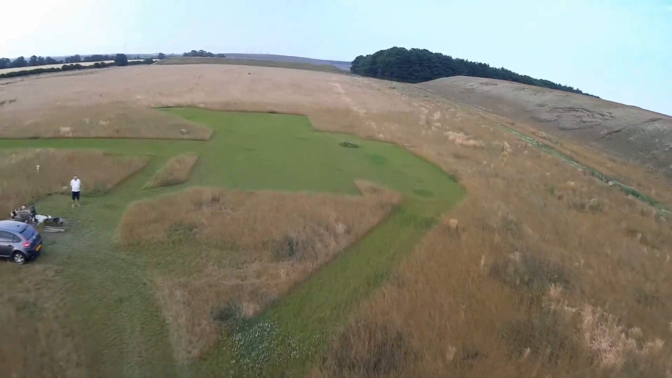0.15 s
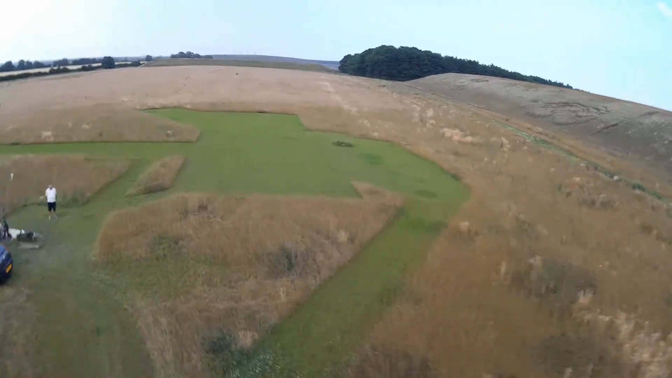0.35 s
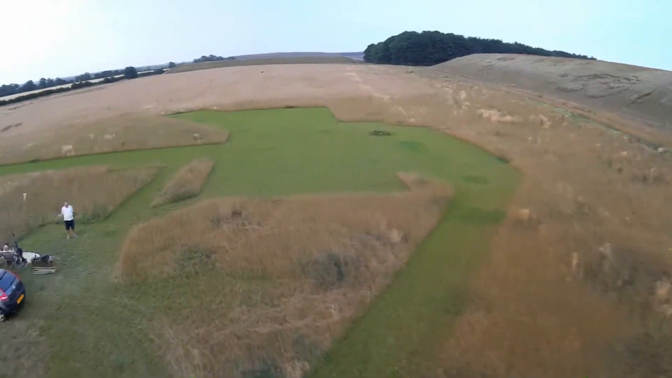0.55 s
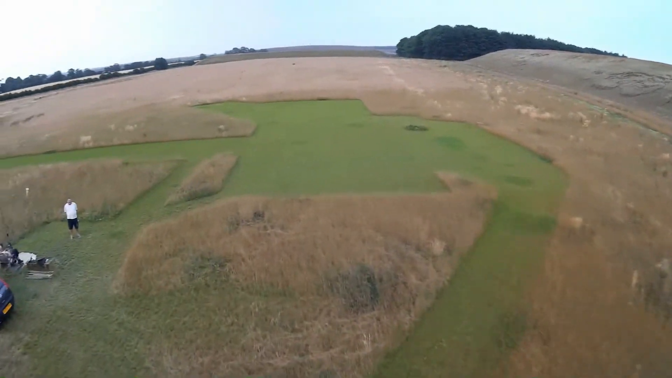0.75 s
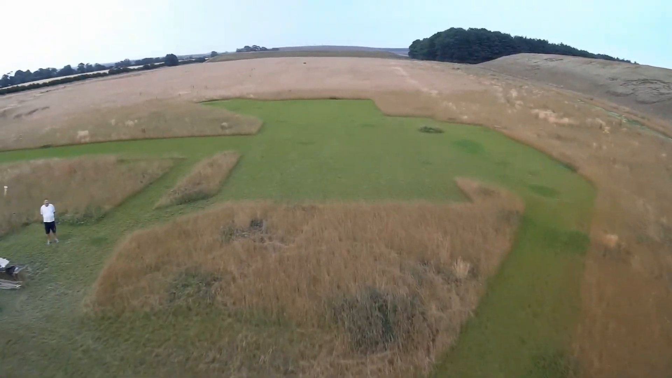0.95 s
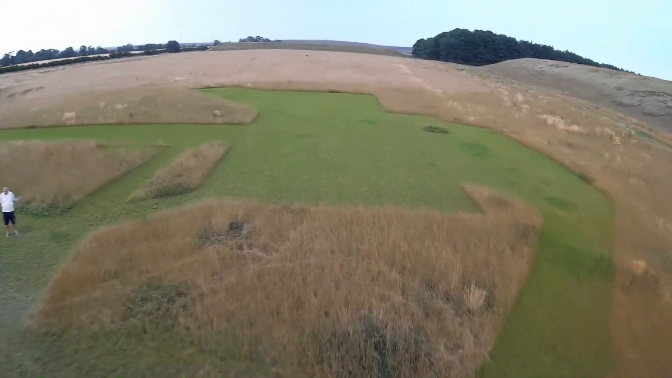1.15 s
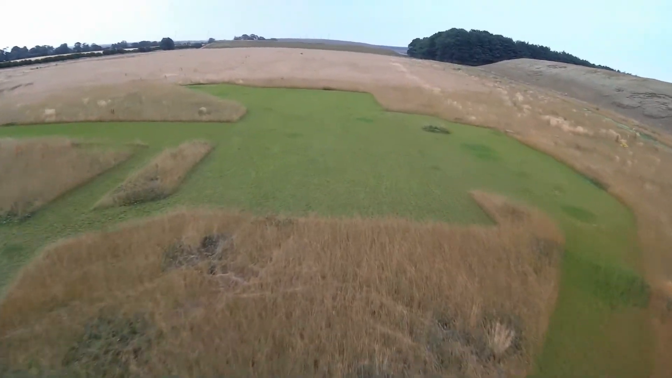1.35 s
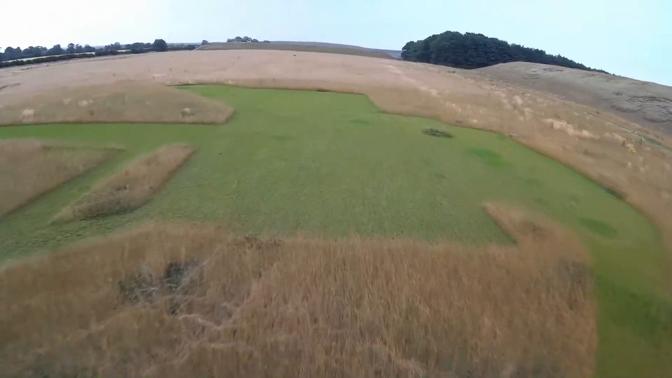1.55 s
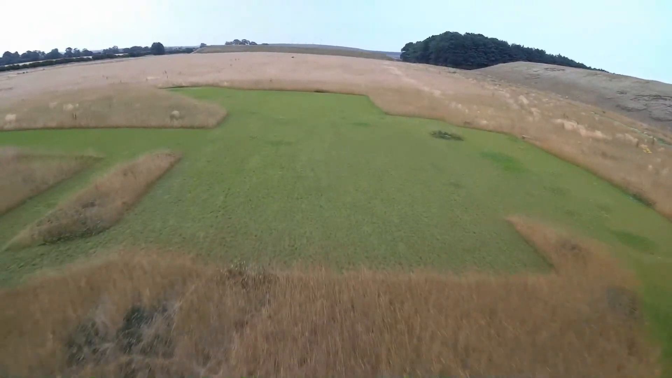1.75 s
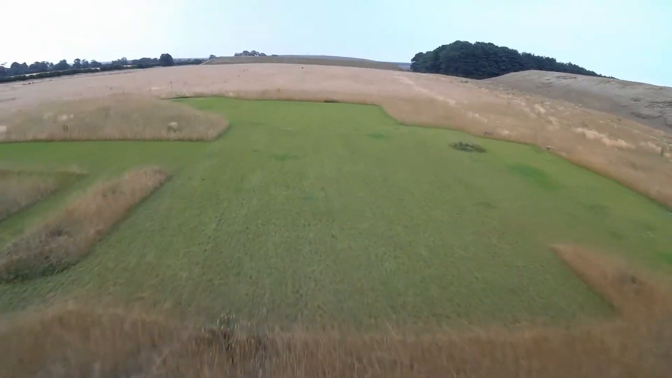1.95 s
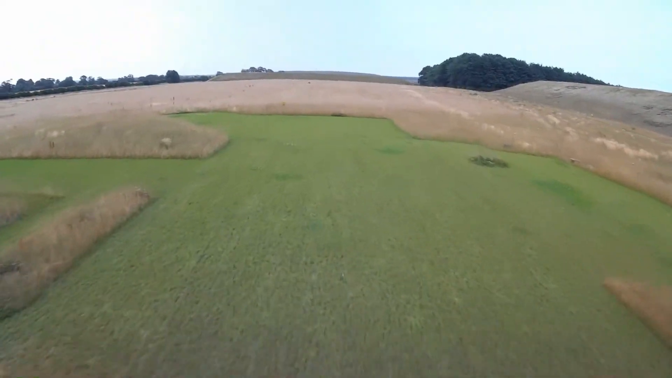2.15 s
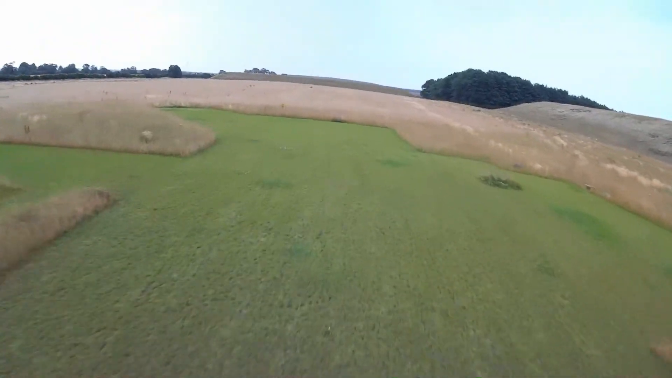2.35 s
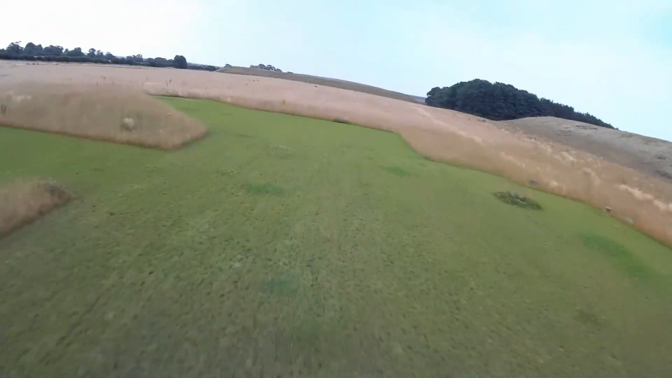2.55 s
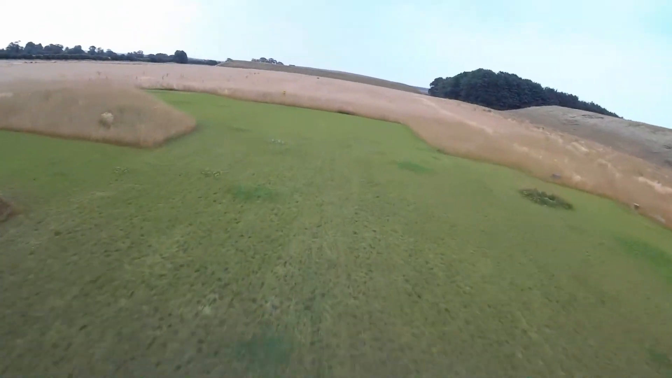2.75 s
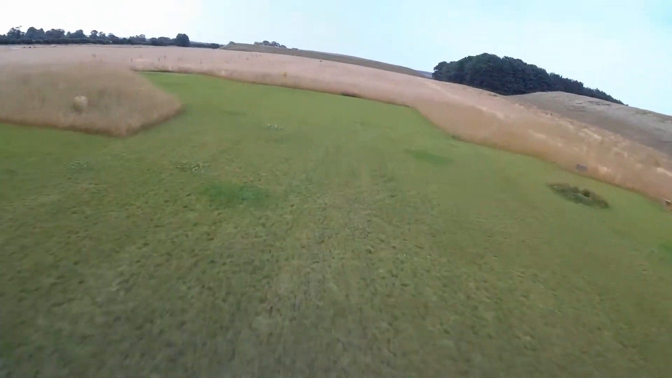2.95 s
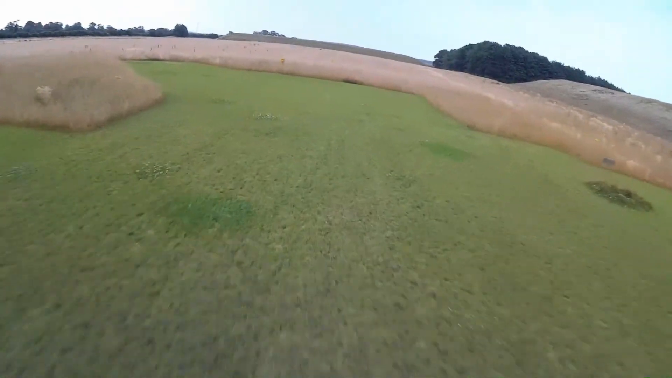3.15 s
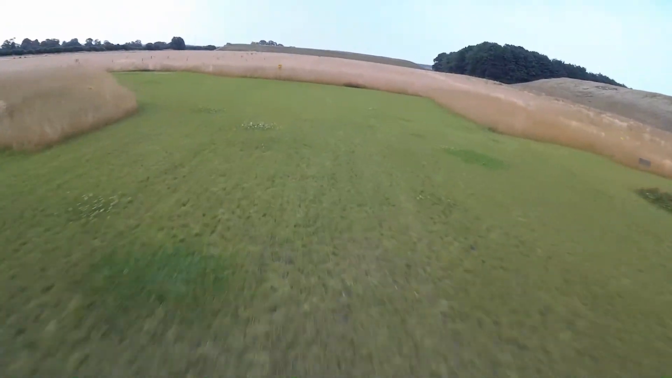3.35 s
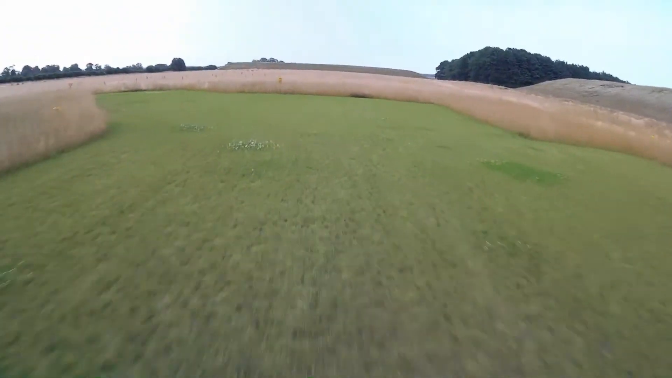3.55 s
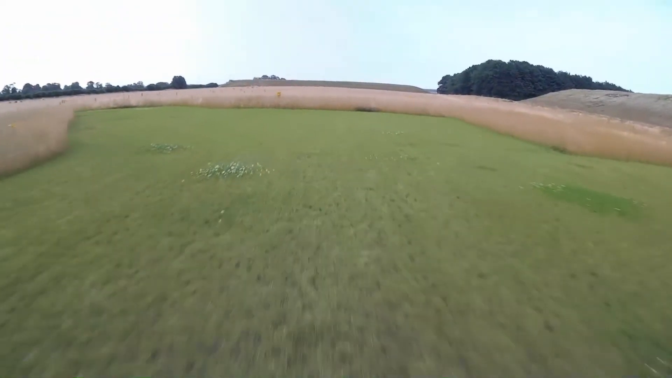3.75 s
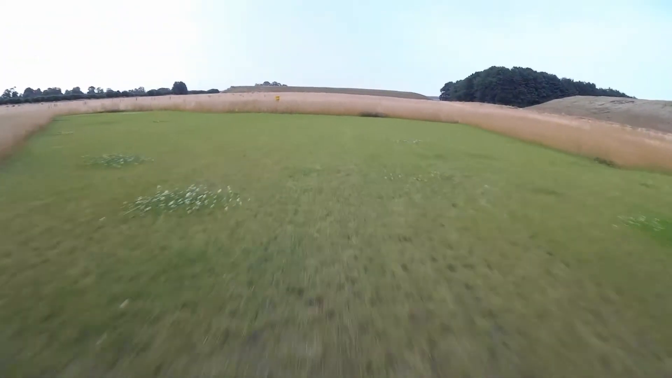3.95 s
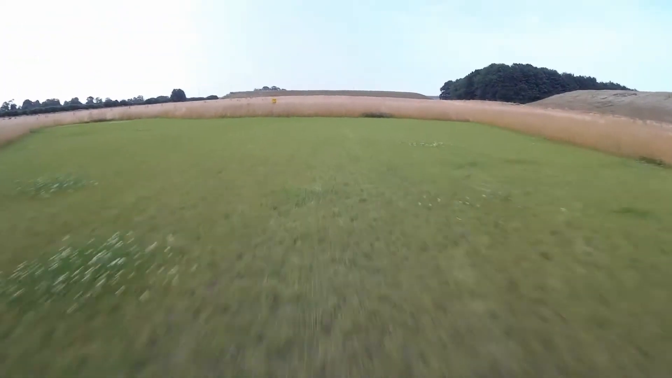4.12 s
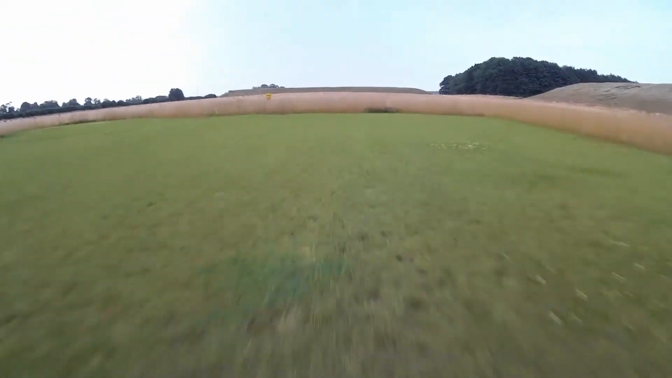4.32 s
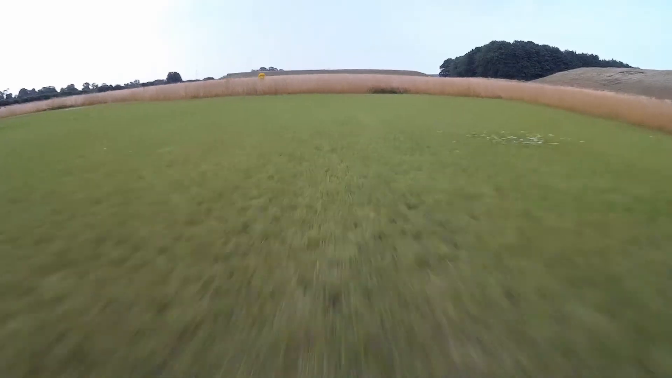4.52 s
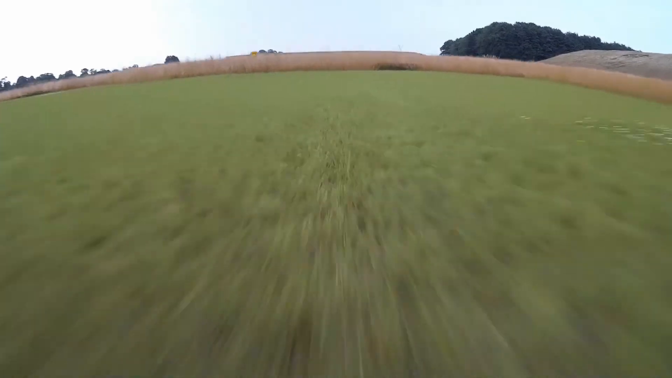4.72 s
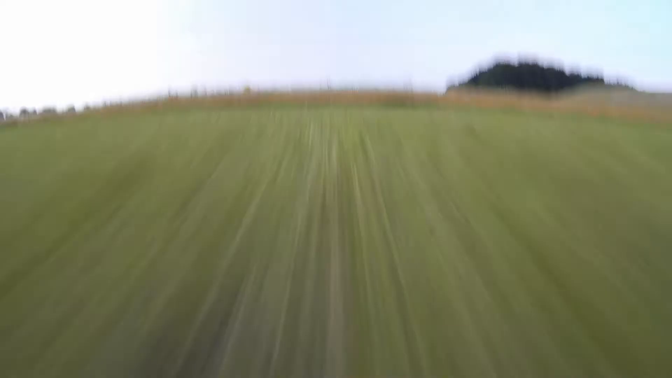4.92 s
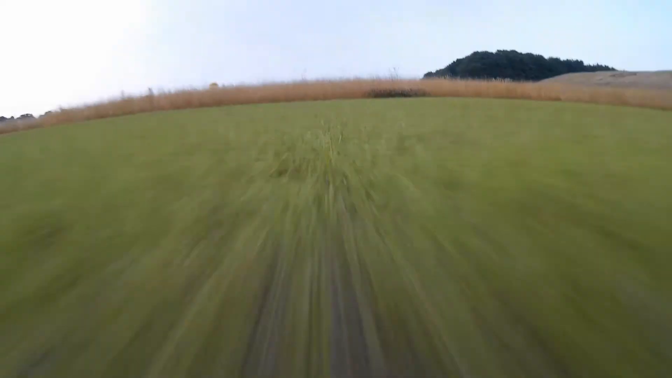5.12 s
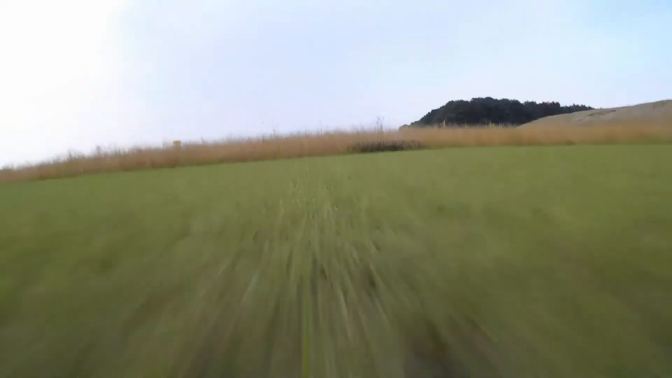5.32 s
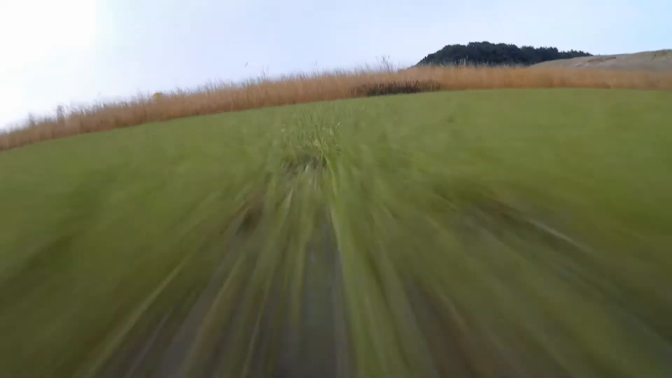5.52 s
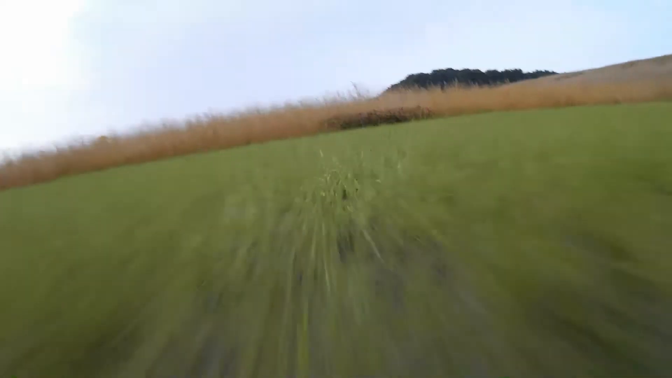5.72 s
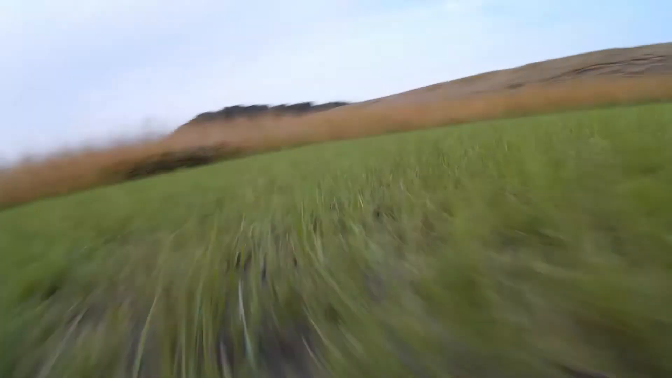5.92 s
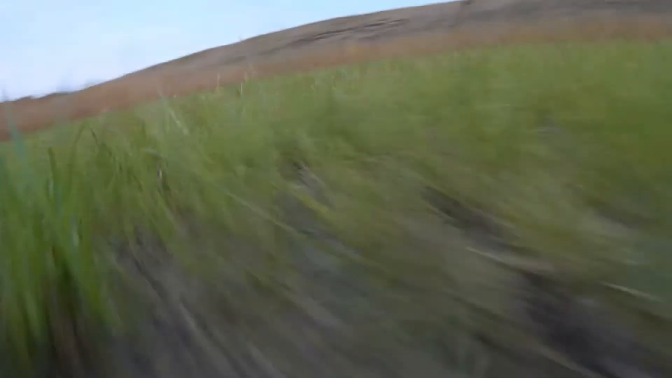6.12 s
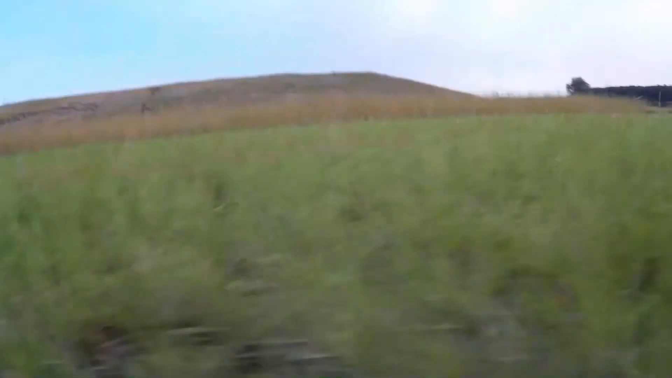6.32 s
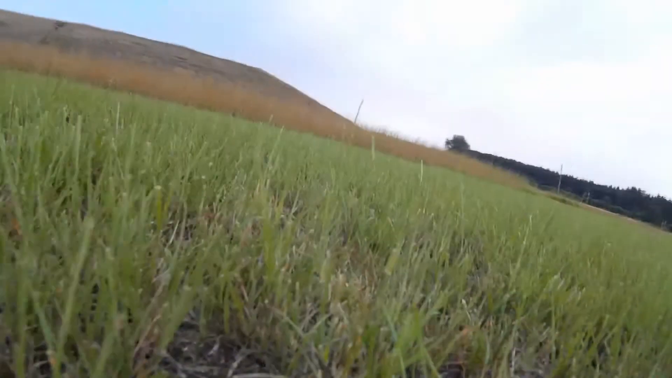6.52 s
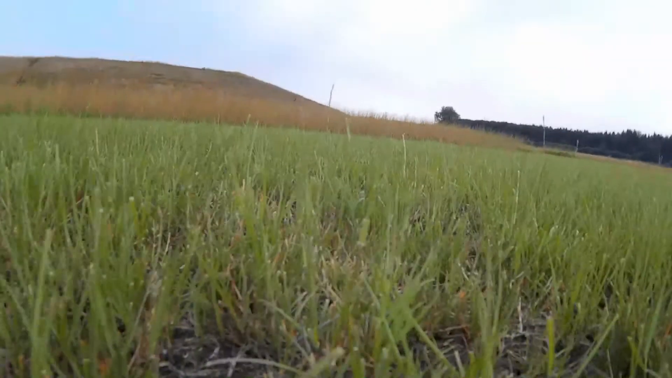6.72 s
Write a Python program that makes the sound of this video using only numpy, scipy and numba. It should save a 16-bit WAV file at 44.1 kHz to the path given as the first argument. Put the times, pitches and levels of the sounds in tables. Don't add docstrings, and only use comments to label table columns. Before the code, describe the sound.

Air flutters and rumbles across a tiny camera's microphone, with a hollow hum and thin, airy whistles. An early sideslip makes it rougher and hissier. Then the wind drops as the light hull skips through mown grass, roaring, crackling and knocking in uneven bursts. The last scrapes fade quickly into quiet with a fine, steady servo buzz of ticks.

```python
import sys
import numpy as np
from scipy import signal
from scipy.io import wavfile
from scipy.ndimage import uniform_filter1d
from numba import njit

SR = 44100
rng = np.random.default_rng(int(sys.argv[2]) if len(sys.argv) > 2 else 0)


def log_audio(samples):
    frames = np.atleast_2d(samples).T
    limited = np.clip(frames, -1, 1)
    pcm = np.round(limited * 32767).astype(np.int16)
    wavfile.write(sys.argv[1], SR, pcm)


def ratio(d):
    e = np.asarray(d, float) / 20
    return 10 ** e


N = 298557
TIME = np.arange(N) / SR
TOP_HZ = 10620

# [t/s, level/dB]
AIR = [(0, 2), (.2, 0), (1.0, 1), (2.2, 1), (3.0, -0.5), (3.7, 0.5), (4.85, -1), (5.1, -2.5), (5.6, -7.5),
       (6.0, -9), (6.25, -10), (6.43, -7.5), (6.47, -23), (6.62, -17), (6.77, -14)]
# [touch t/s, dug in t/s, lifting t/s, clear t/s, scrape level/dB]
SKIPS = [(4.918, 4.962, 5.012, 5.075, -2.5), (5.165, 5.285, 5.332, 5.41, -3),
         (5.54, 5.602, 5.652, 5.695, -3), (5.64, 5.68, 5.765, 5.86, -14.5), (5.795, 5.82, 5.86, 5.89, -9),
         (5.83, 5.88, 5.922, 6.01, -4.5), (6.03, 6.09, 6.124, 6.14, -15), (6.135, 6.152, 6.175, 6.22, -11),
         (6.14, 6.205, 6.226, 6.262, -6.5), (6.28, 6.34, 6.425, 6.47, -17), (6.42, 6.47, 6.52, 6.62, -24),
         (6.51, 6.535, 6.553, 6.6, -19)]
TOUCHDOWN_S, REST_S = SKIPS[0][0], SKIPS[-1][3]


@njit
def svf(x, hz, width):
    y, b, l = np.empty(len(x)), 0., 0.
    for i in range(len(x)):
        g = np.tan(np.pi * hz[i] / SR)
        k = width / hz[i]
        v = (b + g * (x[i] - l)) / (1 + g * (g + k))
        b = 2 * v - b
        l += 2 * g * v
        y[i] = k * v
    return y


def band(x, hz, width):
    hz = hz * np.ones(N)
    return svf(svf(x, hz, 2.02 * width), hz, 2.02 * width)


def body(x, modes, bend=1):
    out = np.zeros(N)
    for k, (hz, width, db) in enumerate(modes):
        out += (-1) ** k * ratio(db) * band(x, hz * bend, width)
    return out


def unit(x):
    return x / np.sqrt(np.mean(x ** 2))


def columns(table):
    s, *cols = np.transpose(table)
    return [np.interp(TIME, s, c) for c in cols]


def ramp(s, values):
    return np.interp(TIME, s, values)


def bump(middle, half, order=2):
    return np.exp(-((TIME - middle) / half) ** order)


def walk(rate):
    k = int(SR / rate)
    steps = np.repeat(rng.standard_normal(N // k + 1), k)
    return 0.91 * uniform_filter1d(uniform_filter1d(steps, k), k)[:N]


def noise(flicker_db, rate):
    return rng.standard_normal(N) * ratio(flicker_db * walk(rate))


def grains(per_second, scatter_db):
    on = rng.random(N) < per_second / SR
    return on * rng.standard_normal(N) * ratio(scatter_db * rng.exponential(size=N))


def slip():
    start, end, edge = 0.28, 0.697, 0.025
    return ramp([start - edge, start + edge, end - edge, end + edge], [0, 1, 1, 0])


def contact():
    power = ratio(2 * (-25 - 4 * (TIME - TOUCHDOWN_S)))
    for touch, dug, lift, clear, db in SKIPS:
        corners = [touch - .1, touch, dug, lift, clear, clear + 0.15]
        power += ratio(2 * ramp(corners, db + np.array([-60, -21, 0, 0, -23, -60])))
    return 10 * np.log10(power)


def buffet():
    # [middle t/s, half length/s, level over the buffet/dB]
    big_eddies = [(0.497, 0.048, 7), (.81, .04, 4), (1.623, 0.12, 2), (2.83, 0.087, 7.5), (3.253, .04, 2),
                  (3.5, .12, 5), (3.9, 0.23, 6), (4.38, 0.15, 3.5), (4.69, 0.043, 4), (5.003, 0.088, 5),
                  (5.512, .1, 6.5)]
    air_db, = columns(AIR)
    low_db = -19.5 + air_db + sum(db * bump(s, half) for s, half, db in big_eddies)
    heave_db = -24 + 0.7 * air_db
    gust_db = -20.5 + 1.21 * air_db + 2.5 * slip() + 9 * bump(0.447, 0.1, order=6)
    flutter_db = -23 + 1.27 * air_db + 5.5 * slip()
    jolt = ratio(0.69 * contact())
    gust_gain = np.hypot(ratio(gust_db), ratio(-22.5) * jolt)
    flutter_gain = np.hypot(ratio(flutter_db), ratio(-22) * jolt)

    # [f/Hz, width/Hz, level/dB]
    buffet_modes = [(83.4, 54.5, 0), (154, 79, 2)]
    gust_modes = [(231.6, 103, 3), (416, 303, -6)]
    low = unit(body(noise(flicker_db=-2.5, rate=7.5), buffet_modes))
    heave = unit(band(noise(flicker_db=-3.0, rate=6), 40., 45.))
    gust = unit(body(noise(flicker_db=0.5, rate=31), gust_modes, 1 + 0.11 * slip()))
    flutter = unit(band(noise(flicker_db=1.0, rate=30), 715.0, 445.0))
    return ratio(low_db) * low + ratio(heave_db) * heave + gust_gain * gust + flutter_gain * flutter


def chirps():
    # [start t/s, end t/s, from f/Hz, to f/Hz, level/dB]
    sweeps = [(0.236, 0.272, 5500, 5900, -26.5), (0.3, 0.305, 5100, 5400, -37.5),
              (0.667, 0.745, 5350, 5640, -25), (1.738, 1.787, 5070, 6130, -26),
              (1.823, 1.872, 5150, 6160, -25), (1.935, 1.967, 5250, 5860, -24),
              (1.957, 2.054, 5300, 5840, -29), (2.911, 2.925, 5000, 5600, -32),
              (3.252, 3.273, 4950, 5800, -25.5), (3.275, 3.345, 5050, 5500, -29),
              (3.49, 3.528, 4930, 5540, -30)]
    hz, gain = np.full(N, 5500.), np.zeros(N)
    for start, end, from_hz, to_hz, db in sweeps:
        on = (TIME > start) & (TIME < end)
        part = (TIME[on] - start) / (end - start)
        hz[on] = from_hz + (to_hz - from_hz) * part
        gain[on] = ratio(db) * np.minimum(part / 0.13, 1)
    return hz, uniform_filter1d(gain, size=150)


def airflow():
    # [t/s, lower whistle f/Hz, edge drive level/dB]
    whistle_path = [(0, 3300, 1), (.1, 3290, 2.5), (.22, 3330, -0.5), (.55, 3570, 1), (.73, 3360, 0.5),
                    (.95, 3210, 1), (1.3, 2990, -0.5), (1.6, 3296, 0), (1.97, 3440, 0), (2.2, 3040, 0.5),
                    (2.58, 2960, -3.5), (2.68, 3140, -0.5), (3.02, 3114, 0), (3.25, 3370, 0.5),
                    (3.4, 3160, 0), (3.5, 3170, 0), (4.2, 3060, 0), (4.93, 2910, 0)]
    # [t/s, level/dB]
    puffs = [(2.66, 1), (2.75, 7), (2.915, 11), (3.11, 5), (3.26, 12), (3.51, 8), (3.6, 7.5), (3.785, 12.5),
             (3.87, 8), (4.04, 7), (4.17, 11), (4.3, 3)]
    # [f/Hz, width/Hz, level/dB]
    cavity_modes = [(1273, 433, 0.5), (1651, 390, 2)]
    low_hz, drive_db = columns(whistle_path)
    fast = (low_hz - 3000) / 100  # airspeed, in 100 Hz of whistle
    high_hz = (1.376 + 0.0056 * fast) * low_hz
    jet_hz, jet_gain = chirps()
    turned = slip()

    hum_db = -18.5 + columns(AIR)[0] + .6 * walk(15)
    low_db = -40 + 2.94 * fast + drive_db + 1.3 * walk(24.05)
    high_db = -34.5 + 0.94 * fast + drive_db - 11 * turned + 0.84 * walk(24.82)
    rush_db = -39.5 + 0.49 * fast + .6 * drive_db + 10.5 * turned
    rush_db += 1.2 * (1 - 0.65 * turned) * walk(35)
    top_db = -52 + 2 * fast + 2.0 * drive_db + 5.5 * turned
    top_db += 2.5 * (1 - 0.56 * turned) * walk(45)
    top_db += sum(db * bump(s, 0.009) for s, db in puffs)

    eddies = unit(ratio(2.0 * walk(220) + 1.9 * walk(90) + 0.94 * walk(35)))
    hum = unit(body(noise(flicker_db=1.0, rate=45), cavity_modes))
    rush = unit(band(noise(flicker_db=-1.0, rate=30), 3010.0, 1600.0))
    top = unit(band(noise(flicker_db=1.0, rate=51), 4900.0, 6100.0))
    low = unit(band(noise(flicker_db=1.8, rate=50), low_hz * (1 + .012 * walk(30)), 150.))
    high = unit(band(noise(flicker_db=1.8, rate=60), high_hz * (1 + .018 * walk(40)), 320.))
    jet = unit(band(noise(flicker_db=2.0, rate=70), jet_hz, 470.0))
    overtone = unit(band(jet ** 2, 1.7 * jet_hz, 1500.))

    whistles = ratio(low_db + 1.5) * low + ratio(high_db + 1.5) * high
    whistles += jet_gain * (jet + ratio(-12.5) * overtone)
    hiss = ratio(rush_db + 7.5) * rush + np.hypot(ratio(top_db + 6.5), ratio(-10.5) * jet_gain) * top
    air = ratio(hum_db) * hum + eddies * (hiss + whistles)
    return air * ratio(ramp([4.93, 5.0, 6.2, 6.6], [0.5, -4.5, 1.5, -1.5]))


def thuds():
    # [t/s, f/Hz, peak level/dB]
    bumps = [(.362, 245, -10), (.455, 270, -11), (5.04, 60, -13), (5.615, 100, -10.5), (5.655, 80, -13),
             (5.77, 110, -13), (5.935, 90, -15.5), (6.09, 110, -17), (6.175, 280, -10), (6.198, 90, -8.5),
             (6.255, 70, -14), (6.405, 45, -18), (6.415, 336, -13.5), (6.5, 380, -20), (6.54, 230, -20.5),
             (6.655, 290, -19), (6.73, 90, -27)]
    out = np.zeros(N)
    for s, hz, db in bumps:
        turns = np.clip(TIME - s, 0, None) * hz
        push = np.e * turns * np.exp(-turns) * np.exp(-turns ** 2 / 4)
        out += ratio(db) * push * np.sin(2 * np.pi * turns)
    return out


def hull(dull, sharp):
    # [f/Hz, width/Hz, level/dB]
    low_modes = [(1203, 380, 4), (1510, 410, 5), (690, 500, -3.5)]
    mid_modes = [(2490, 350, 9), (3438, 315, 11), (4590, 210, 1.5), (5710, 370, 8.5), (4350, 2700, -5)]
    top_modes = [(7130, 630, 6.5), (8550, 800, 1.5), (9560, 900, 5)]
    flex = 1 + 0.03 * walk(25)

    def ring(x, modes):
        return body(x, modes, flex) / np.std(body(rng.standard_normal(N), modes))

    return ring(dull, low_modes) + ring(sharp, mid_modes) + ratio(-12) * ring(sharp, top_modes)


def grass(scrape_db, dig):
    patter = unit(grains(per_second=1300, scatter_db=1.4))
    roar = unit(noise(flicker_db=2.5, rate=200))
    blades = (1 - 0.69 * dig) * patter + (0.6 + 0.44 * dig) * roar
    blades *= ratio(scrape_db + 2.7 * dig ** 2 - 3.0)
    return blades * np.clip((TIME - TOUCHDOWN_S) / 0.03, 0, 1)


def stray_stems():
    slide = REST_S - TOUCHDOWN_S
    return [(TOUCHDOWN_S + slide * u, -8 - 4 * slide * u - 6 * v) for u, v in rng.random((44, 2))]


def servo_ticks():
    return [(s, -14.5) for s in np.arange(6.6754, N / SR - .01, .0198)]


def landing():
    # [t/s, peak level/dB]
    strikes = [(4.9377, -6), (4.9553, 2.5), (5.0519, 1), (5.0823, -5), (5.1836, -6.5), (5.1976, -1),
               (5.2077, 8), (5.2212, 3.5), (5.2504, 1), (5.3983, -4.5), (5.4405, -6), (5.5039, -8),
               (5.5273, -4), (5.5665, 2.5), (5.575, 2), (5.684, -2), (5.6984, -3), (5.7284, -10),
               (5.8114, 0.5), (5.824, -3), (5.8411, 8), (5.9385, 9), (5.9708, 0.5), (6.0534, -5.5),
               (6.083, -4.5), (6.2597, -9), (6.2941, -10.5), (6.374, -1), (6.4652, -14), (6.5474, -11)]
    scrape_db = contact()
    dig = np.clip((scrape_db + 12) / 9, 0, 1)
    blades = grass(scrape_db, dig)
    bright_db = -1.5 - 0.5 * dig * (-0.5 + 4 * (TIME - TOUCHDOWN_S))
    share = np.clip(ratio(bright_db), .45, .95)
    dull = blades * np.sqrt(1 - share ** 2)
    sharp = blades * share

    after = np.arange(300) / SR
    for s, db in list(strikes) + servo_ticks() + stray_stems():
        crackle = rng.standard_normal(300) * after * np.exp(-after / 0.00074)
        tap = ratio(db - 14.0) * unit(crackle)
        at = int(s * SR)
        sharp[at:at + 300] += tap
        dull[at:at + 300] += tap * ratio(-5)
    stiff = ratio(-4 / 3 * np.clip(TIME - 5.95, 0, .3) / 0.25)
    return hull(dull, sharp * stiff)


def scene():
    mid = buffet() + airflow() + thuds() + landing()
    return np.array([mid, mid])


def thin_treble(x):
    # [f/Hz, level/dB]
    side_level = [(50, -34), (140, -27), (330, -25), (620, -19), (1030, -23.5), (1820, -19), (4300, -15),
                  (10000, -9)]
    hz, _, z = signal.stft(x, SR, nperseg=1024)
    power = uniform_filter1d(np.abs(z) ** 2, size=3, axis=1)
    bands = np.repeat(power[1:].reshape(-1, 4, z.shape[1]).mean(axis=1), 4, axis=0)

    mask_db = np.interp(hz[1:, None], [6500, 8800, 9600, TOP_HZ], [-63, -60, -54, -43])
    mask_db = mask_db + 3 * np.repeat(rng.standard_normal((128, z.shape[1])), 4, axis=0)
    mask = ratio(2 * uniform_filter1d(mask_db, size=2, axis=1))
    z[1:] *= (bands > mask * power.sum(axis=0)) & (hz[1:, None] < TOP_HZ)

    side_hz, side_db = np.transpose(side_level)
    spread = ratio(np.interp(np.log(hz + 1), np.log(side_hz), side_db) - 0.5)
    side = z * spread[:, None] * np.exp(2j * np.pi * rng.random(z.shape))
    return np.array([signal.istft(z + sign * side, SR, nperseg=1024)[1][:N] for sign in (1, -1)])


def band_limit(x):
    return signal.sosfilt(signal.butter(12, 10640, fs=SR, output="sos"), x)


def record(dry):
    steep = signal.ellip(8, .1, 50, TOP_HZ, fs=SR, output="sos")
    clipped = np.clip(signal.sosfiltfilt(steep, dry[0]), -1.16, 1.16)
    mix = np.clip(thin_treble(clipped), -1, 1)
    return band_limit(mix)


dry = scene()
out = record(dry)
log_audio(out)
```